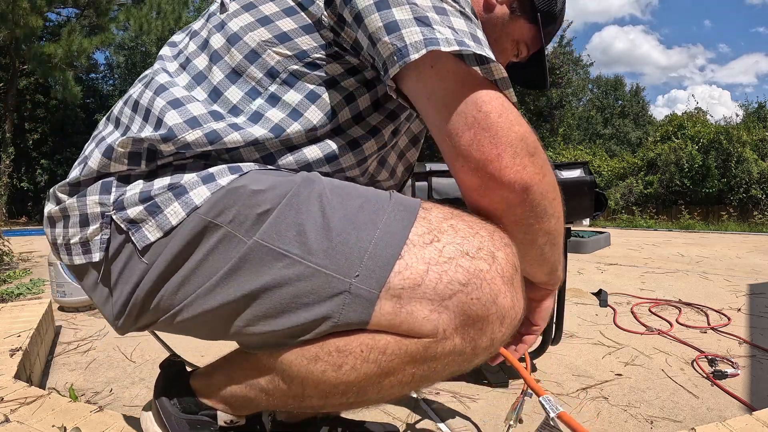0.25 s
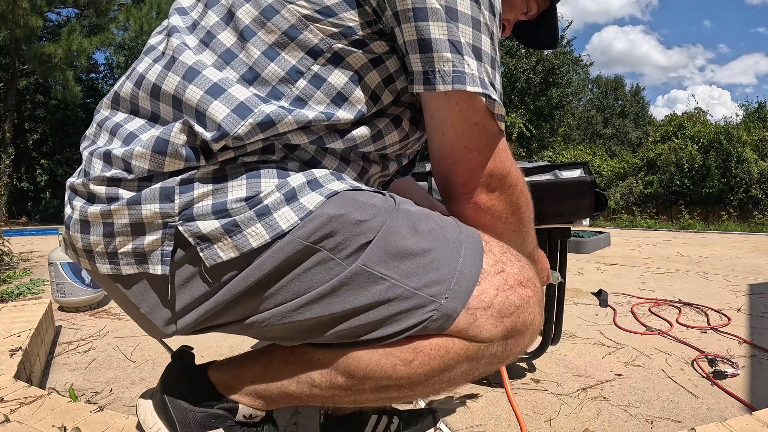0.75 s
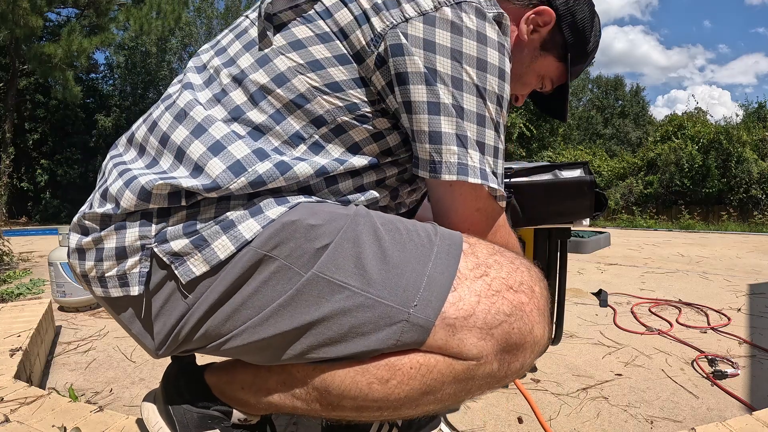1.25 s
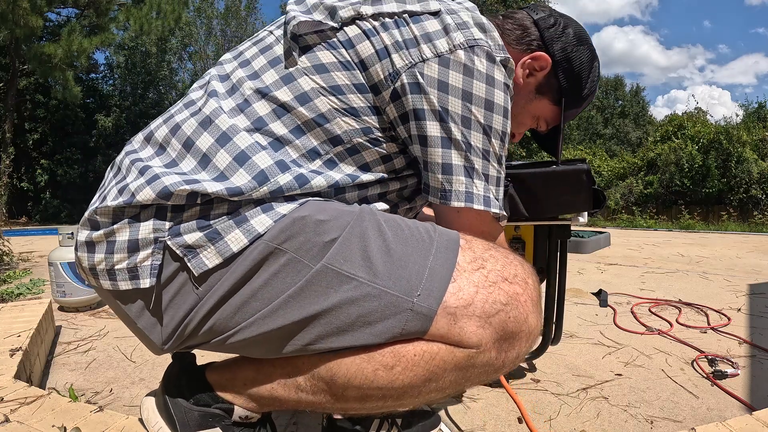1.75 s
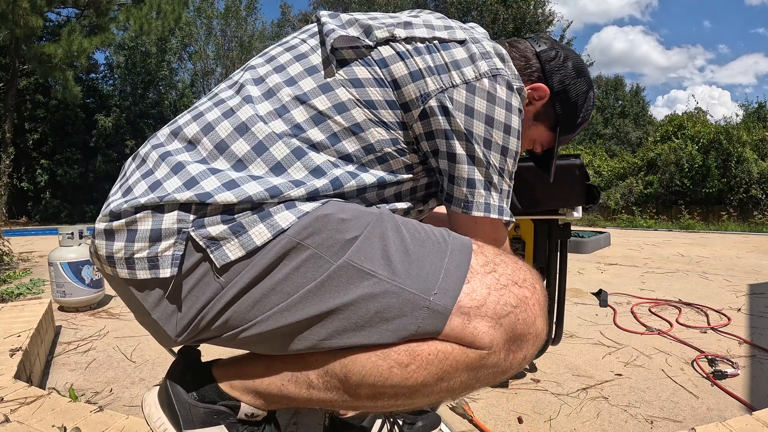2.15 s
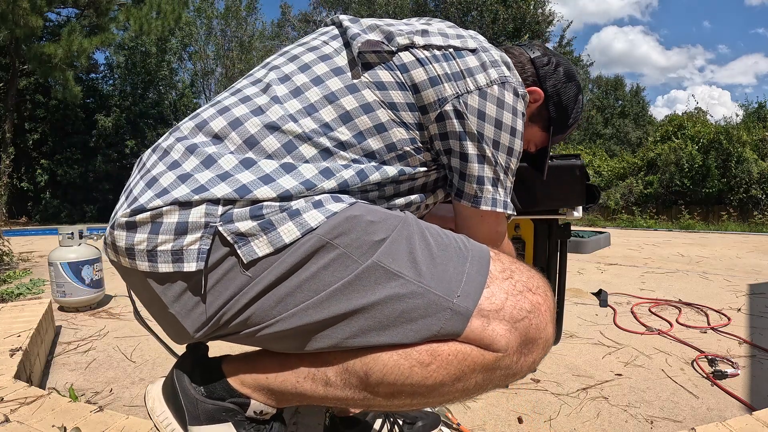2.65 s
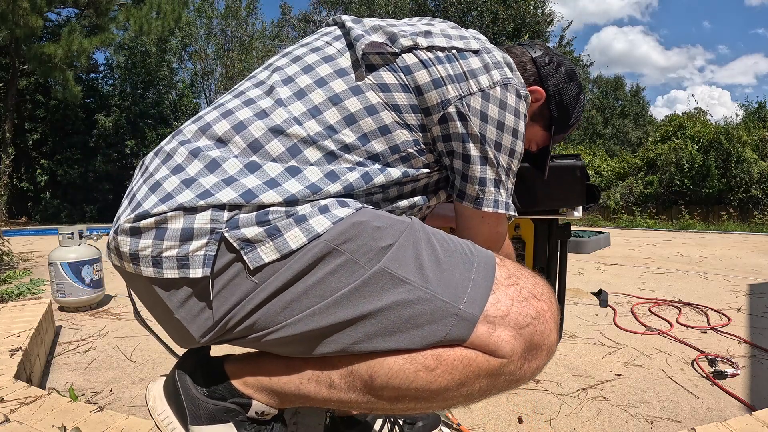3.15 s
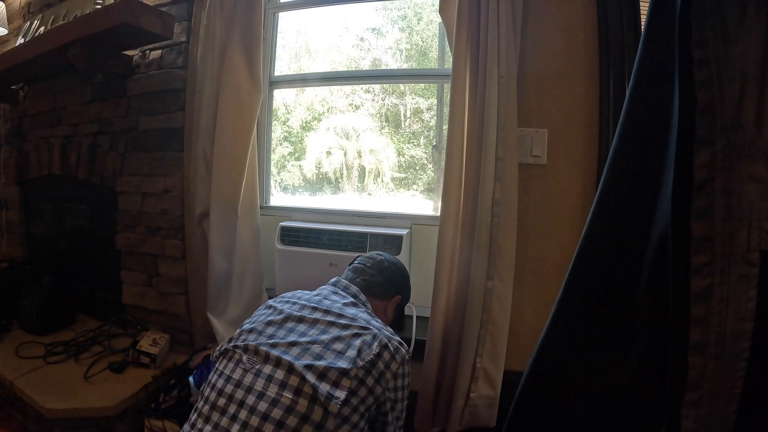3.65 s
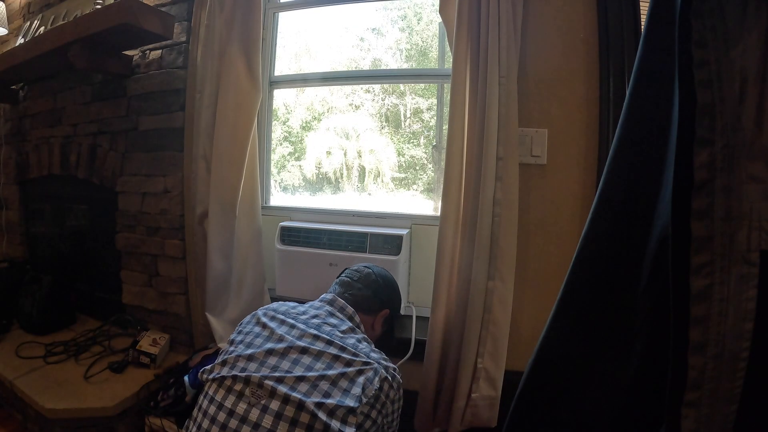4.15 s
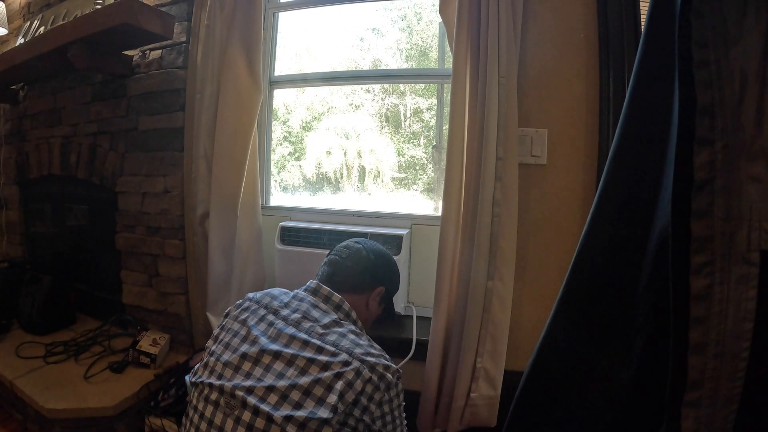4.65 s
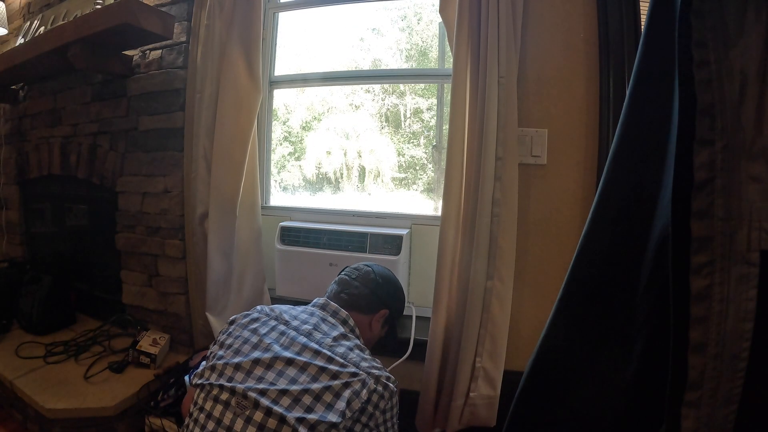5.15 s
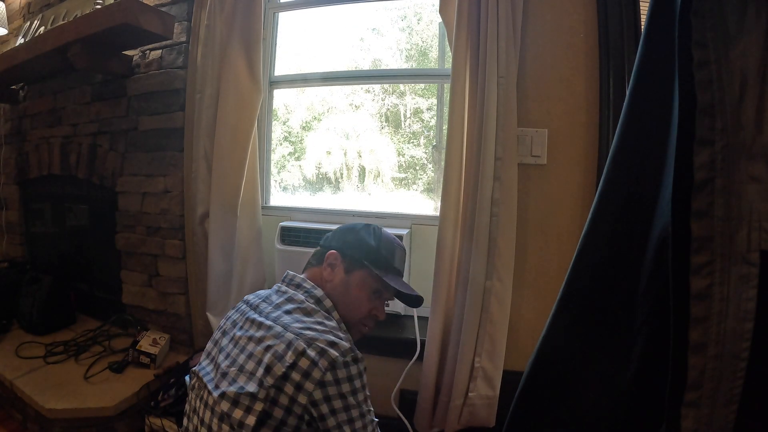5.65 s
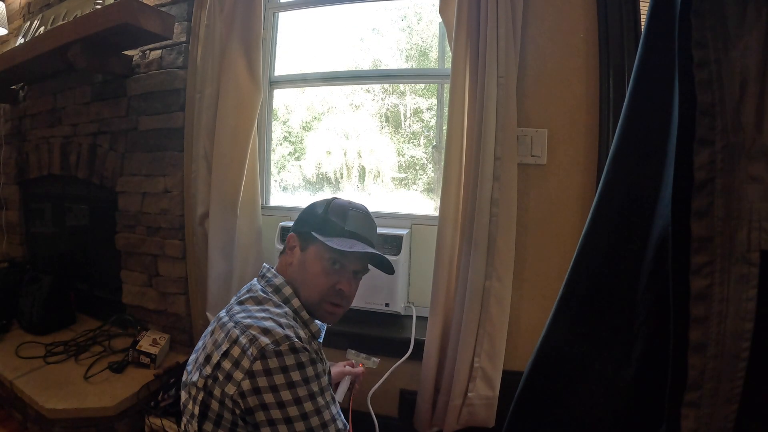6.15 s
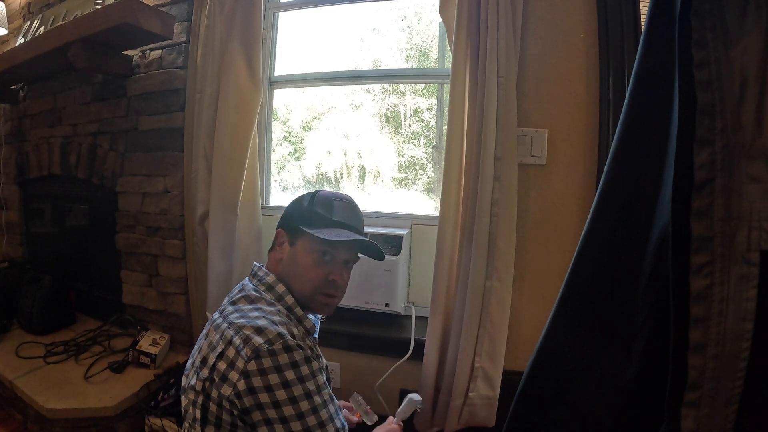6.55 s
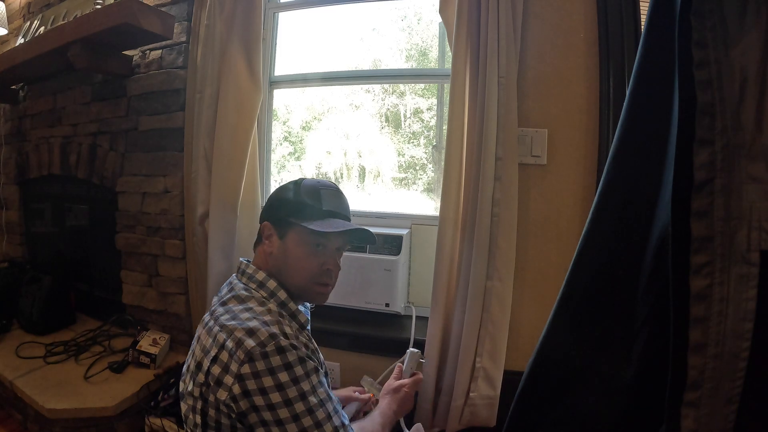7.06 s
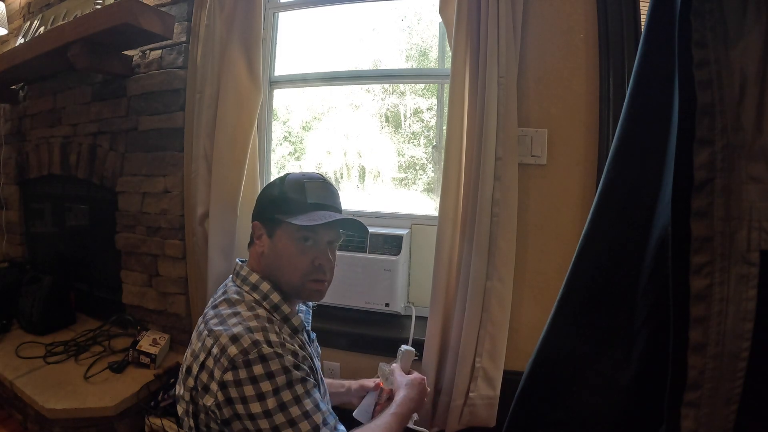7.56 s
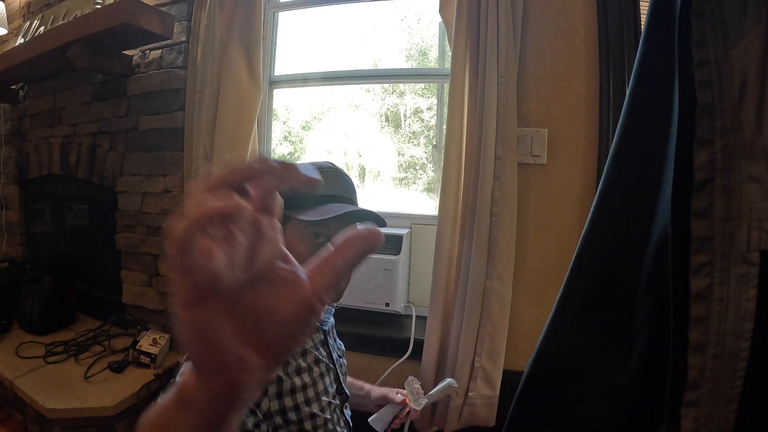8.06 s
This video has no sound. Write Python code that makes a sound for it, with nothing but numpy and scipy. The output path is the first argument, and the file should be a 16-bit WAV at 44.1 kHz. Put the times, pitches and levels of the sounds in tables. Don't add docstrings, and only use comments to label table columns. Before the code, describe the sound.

From 0 to 3.2 seconds a small four-stroke generator runs loud and steady close to a camera microphone outdoors. About thirty firings a second merge into a rough, throbbing low buzz, with rushing air, bright metal clatter, valve tapping and a higher panel tone singing in spells; air noise swells slightly near 0.5 and 2.8. At about 3.25 the sound cuts almost instantly to a room: the engine is now much quieter, a dull bassy drone through the window, narrow at first and opening to wide stereo between 4.6 and 6.9. A light knock comes at 3.5, a tumbling cluster of hollow knocks with cable scraping at 4.0-4.3, softer bumps and rubs at 4.7-5.4. Tiny plastic ticks run from 5.4 to 6.5, a firm double knock lands at 6.56, a clear click at 6.7, fainter contacts at 7.2 and 7.5. Soft sleeve rustles close it after 8.0.

```python
import sys
import numpy as np
from scipy import signal
from scipy.fft import rfft, irfft, next_fast_len
from scipy.io import wavfile
from scipy.ndimage import uniform_filter1d

SR = 44100
rng = np.random.default_rng(int(sys.argv[2]) if len(sys.argv) > 2 else 0)


def voltage_ratio(decibels):
    exponent = np.asarray(decibels, float) / 20
    return 10 ** exponent


def materialize(psi):
    bounded = np.clip(np.atleast_2d(psi).T, -1, 1)
    quanta = np.round(bounded * 32767).astype(np.int16)
    wavfile.write(sys.argv[1], SR, quanta)


N = 365588
T = np.arange(N) / SR
LEAD = int(.2 * SR)

NEAR_FIRING_S, FAR_FIRING_S = .0039, 3.3043
# (time of one firing [s], beat [dB], rush [dB], rumble [dB], size scatter
# [dB], timing scatter [s], throb [dB], clatter [dB], repeating share [0-1], tappet [dB])
NEAR_ENGINE = (NEAR_FIRING_S, -14, -24.5, -34, 0.14, .00008, 0.6, -28.5, 0.24, -45)
FAR_ENGINE = (FAR_FIRING_S, -35.5, -47.5, -45, 0.31, .00008, -0.48, -54.5, 0.53, -120)
# (frequency [Hz], level [dB per Hz])
NEAR_RUMBLE = [(15, -13), (45, 11), (90, 3.5), (180, 13), (300, 9), (420, -39), (900, -91)]
FAR_RUMBLE = [(12, 27), (45, 25), (90, 3), (180, 12), (250, 13.5), (300, -1), (420, -28), (900, -91)]


def generator(near):
    (start, beat_db, rush_db, rumble_db, scatter_db, jitter, throb_db,
     clatter_db, repeat, tappet_db) = NEAR_ENGINE if near else FAR_ENGINE
    cycle, firings, rate = firing_clock(near, start, jitter)
    throb = voltage_ratio(throb_db * np.cos(2 * np.pi * (cycle - .15)) + .5 * walk(9))
    shade = shading(near)
    beat = exhaust_beat(near, firings, rate, scatter_db, beat_db)
    air = air_rush(near, firings, rate, rush_db) * throb * shade
    metal = casing_clatter(near, firings, rate, repeat, clatter_db) * throb
    low = level(colour(rng.standard_normal(N), NEAR_RUMBLE if near else FAR_RUMBLE), rumble_db) * shade
    return beat + air + metal + low + tappets(firings, tappet_db) + frame_panel(near, cycle)


# (time [s], firing rate [firings per s])
NEAR_SPEED = [(.3, 30.585), (.73, 30.542), (1.17, 30.492), (1.6, 30.51), (2.03, 30.591), (2.47, 30.659),
              (2.9, 30.546)]
FAR_SPEED = [(3.64, 30.823), (4.07, 30.786), (4.51, 30.857), (4.94, 30.819), (5.38, 30.744), (5.81, 30.569),
             (6.24, 30.588), (6.68, 30.835), (7.11, 30.726), (7.55, 30.706), (7.98, 30.823)]


def firing_clock(near, start, jitter):
    speed = NEAR_SPEED if near else FAR_SPEED
    rate = speed[0][1]
    cycle = np.cumsum(np.interp(T, *np.transpose(speed))) / SR
    cycle -= np.interp(start, T, cycle)
    turns = np.arange(np.ceil(cycle[0]) - 4, cycle[-1] - 1)
    when = np.interp(turns, np.r_[cycle[0] - 30, cycle], np.r_[-30 / rate, T])
    firings = (when + jitter * rng.standard_normal(len(turns))) * SR + LEAD
    return cycle, firings, rate


# (multiple of the firing rate [1], level [dB])
NEAR_ORDERS = [(1, -6), (2, -0.5), (3, -11.5), (4, 1), (5, 3), (6, -18), (7, 3), (8, -0.5), (9, -12),
               (10, -10), (12, -8), (13, -11.5), (14, -15.5), (15, -17), (17, -14.5), (20, -14),
               (21, -16.5), (22, -21), (23, -7), (24, -27), (25, -34), (26, -35), (27, -16.5), (30, -17),
               (32, -38), (34, -15), (36, -24.5), (38, -26), (40, -15), (44, -24.5)]
FAR_ORDERS = [(1, 2), (2, -9.5), (3, -5.5), (4, 2), (5, 4), (7, -4.5), (8, -18), (9, -12.5), (10, -19.5),
              (11, -6.5), (12, -24), (13, -11), (14, -36), (16, -13.5), (20, -30), (22, -41), (24, -15),
              (25, -56), (26, -21.5), (30, -18), (31, -23), (38, -39), (39, -21), (40, -31), (44, -24.5),
              (45, -23), (46, -30.5)]
# (pitch [Hz], width [Hz])
NEAR_CHAMBERS = [(55, 224), (174, 112), (276, 16)]
FAR_CHAMBERS = [(427, 107), (142, 10)]


def exhaust_beat(near, firings, rate, scatter_db, beat_db):
    orders = dict(NEAR_ORDERS if near else FAR_ORDERS)
    k = np.arange(1, 47)
    db = [orders.get(m, -33.5) for m in k]
    hz = rate * np.r_[0, k, 1.3 * k[-1], 5 * k[-1]]
    pipe = causal(hz, np.r_[-22, db, -70, -130], NEAR_CHAMBERS if near else FAR_CHAMBERS)
    size_db = scatter_db * rng.standard_normal(len(firings))
    return level(-strike(firings, size_db, pipe), beat_db)


# (frequency [Hz], level [dB per Hz])
NEAR_RUSH = [(190, -27), (330, -1.5), (361, -0.5), (468, -4.5), (514, -1), (573, -15), (688, -2), (724, -5),
             (776, -7), (806, -12.5), (1070, -6.5), (1280, -12.5), (1390, -10), (1500, -12.5), (1950, -60),
             (3300, -120)]
FAR_RUSH = [(190, -29), (330, -2), (428, -12), (498, -10.5), (524, -19), (555, -13.5), (642, -13),
            (752, -12.5), (994, -16.5), (1190, -11.5), (1260, -14), (1290, -19.5), (1500, -17.5),
            (1950, -75), (3300, -120)]


def air_rush(near, firings, rate, db):
    repeat = .28
    echoed = repeating_noise(firings, rate, 1.0 * walk(2.488))
    gas = np.sqrt(repeat) * echoed + np.sqrt(1 - repeat) * rng.standard_normal(N)
    return level(colour(gas, NEAR_RUSH if near else FAR_RUSH), db)


# (frequency [Hz], level [dB per Hz])
NEAR_CLATTER = [(1300, -35), (1500, -15.5), (1680, -4.5), (1930, 0), (2270, -8), (2700, -2.5), (3100, -8),
                (4100, -13.5), (5200, -11.5), (5900, -17.5), (7300, -17.5), (8300, -25), (10500, -27),
                (11400, -46), (12100, -34), (13350, -39), (15100, -44.5)]
FAR_CLATTER = [(1300, -7), (1500, -2.5), (2100, -1.5), (2500, -6.5), (2750, -7), (3100, -13), (5000, -20),
               (6800, -23), (8100, -28), (9900, -34.5), (11100, -38), (12300, -33), (13250, -43),
               (13850, -54)]


def casing_clatter(near, firings, rate, repeat, db):
    repeat = np.clip(repeat, .4, 1)
    same = repeating_noise(firings, rate, 1.1 * walk(3))
    metal = np.sqrt(repeat) * same + np.sqrt(1 - repeat) * rng.standard_normal(N)
    return level(colour(metal, NEAR_CLATTER if near else FAR_CLATTER), db)


def tappets(firings, db):
    lash = strike(firings, 2.0 * rng.standard_normal(len(firings)), np.ones(1))
    fade = np.exp(-1 / (0.011 * SR))
    tap = uniform_filter1d(signal.lfilter([1], [1, -fade], np.roll(lash, 300)), 40)
    tone = [(5000, -26), (6800, 4.0), (9500, -6.5), (12000, -9), (13500, -23), (15000, -62)]
    return level(tap * colour(rng.standard_normal(N), tone), db)


# (start [s], hold [s], level [dB])
NEAR_PANEL = [
    (.15, 0.57, -34),
    (0.948, 0.091, -35),
    (1.25, 0.62, -38),
    (2.15, .1, -42),
    (2.9, .3, -56),
]
FAR_PANEL = [
    (3.5, .1, -57),
    (4.05, .4, -59),
    (4.95, .55, -61),
    (5.87, .42, -56),
    (6.55, .08, -59),
    (7.15, 1.1, -58),
]


def frame_panel(near, cycle):
    order = 44 if near else 40
    effort = spells(NEAR_PANEL if near else FAR_PANEL, rise=0.075, fall=0.066)
    tone = np.sin(2 * np.pi * order * cycle + 1.06 * walk(8.7))
    return np.sqrt(2) * effort * voltage_ratio(-0.5 + 0.87 * walk(11)) * tone


# (start [s], hold [s], extra gain [share])
NEAR_SHADE = [
    (.4, 0.42, 0.22),
    (2.7, 0.37, 0.19),
]
FAR_SHADE = [
    (6.65, .1, 0.36),
    (7.45, .1, 0.22),
    (8.2, .1, 0.66),
]


def shading(near):
    rows = NEAR_SHADE if near else FAR_SHADE
    return 1 + sum(share * spells([(s, hold, 0)], 0.14, 0.14) for s, hold, share in rows)


# (time [s], peak [dB], pitch [Hz], upper ring pitch [Hz], upper ring level [dB])
KNOCKS = [(3.462, -34, 352, 880, 3), (4.031, -26, 387, 720, -12), (4.053, -26.5, 392, 1110, -2.5),
          (4.079, -30, 307, 810, -6), (4.122, -31.5, 540, 845, 2), (4.155, -28.5, 357, 802, -1.5),
          (4.19, -21, 338, 930, -5.5), (4.217, -20.5, 384, 724, -8), (4.239, -23, 463, 703, -20),
          (4.28, -29, 391.5, 990, -18), (4.308, -29, 313, 711, -17), (4.718, -29.5, 410, 754, -5),
          (5.123, -35.5, 370, 845, 6.5), (5.273, -29.5, 338, 869, -14), (5.352, -32.5, 302, 940, 1.5),
          (6.559, -20.5, 264, 886, 0), (6.564, -21.5, 251, 704, -3), (6.575, -29, 295, 1150, -18),
          (6.59, -34, 352, 1000, -12), (7.493, -33, 257, 790, 1)]


def knocks():
    out = np.zeros(N)
    for s, db, hz, upper_hz, ring_db in KNOCKS:
        body = 0.99 * ring(hz, 0.061, 0.0018) + 0.59 * burst(hz * 0.854, 384, 0.1)
        upper = 0.78 * ring(upper_hz, 0.041, 0.0007) + 0.43 * burst(900, 1500, 0.03)
        upper += 0.21 * burst(900, 1800, 0.57)
        crack = 0.73 * ring(3170, 0.031, .001) + .15 * burst(3200, 1200, 0.03)
        crack_db = -19 + 1.7 * ring_db
        add(out, s, voltage_ratio(db) * (body + voltage_ratio(ring_db) * upper + voltage_ratio(crack_db) * crack))
    return out


# (time [s], peak at 6-10 kHz [dB], level below that band [dB], level above it [dB])
TICKS = [(5.3698, -64, -3, -7), (5.4774, -64, 2, -5), (5.5523, -59, -4, -12), (5.5844, -59, -2, -16),
         (5.6294, -62, -1, -17), (5.9379, -57, -5, -22), (5.9813, -61, -4.5, -11), (6.0067, -52, -3, -16),
         (6.2302, -59, 3, -14), (6.2507, -54, -10, -17), (6.3165, -55, -3, -22), (6.3394, -60, 7, -23),
         (6.3844, -63, 0, -10), (6.4448, -51, -7, -33), (6.5576, -58.5, 9, -27), (6.7032, -44.5, 1, -19),
         (7.1826, -53, -11, -29)]


def ticks():
    out, t60 = np.zeros(N), 0.03
    for s, db, low_db, top_db in TICKS:
        click = burst(7500, 3600, t60)
        click += voltage_ratio(low_db + 2.5) * burst(4300, 2200, t60)
        click += voltage_ratio(top_db) * burst(11800, 3000, t60)
        add(out, s, voltage_ratio(db) * click)
    return out


# (start [s], hold [s], level [dB])
DRAG = [
    (4.04, 0.14, -38),
    (4.2, 0.078, -35.5),
    (4.99, 0.071, -40.5),
    (5.12, 0.068, -41),
    (5.3, 0.046, -42),
    (6.565, .03, -37.5),
]
# (start [s], hold [s], level [dB])
SLEEVE = [
    (4.2, .05, -73.5),
    (8.06, .09, -68.5),
    (8.23, .12, -67.5),
]


def handling():
    floor = [(150, -8.0), (280, 7), (400, 5.5), (560, -1.5), (1200, -12), (4000, -56), (9000, -68)]
    weave = [(1500, -8), (4000, 1.5), (8000, -3), (13000, -18), (15500, -36)]
    drag = level(colour(rng.standard_normal(N), floor), 0)
    cloth = level(colour(rng.standard_normal(N), weave), 0)
    drag *= spells(DRAG, rise=.015, fall=0.15) * voltage_ratio(-4.5 + 1.4 * walk(60))
    cloth *= spells(SLEEVE, rise=0.05, fall=.025) * voltage_ratio(4.5 + 0.9 * walk(60))
    return drag + cloth


# (frequency [Hz], level [dB])
NEAR_SIDE = [(60, -33), (110, -45), (200, -23.5), (370, -29.5), (690, -4), (1260, -8), (2320, -6),
             (4270, -7), (7850, -9.5), (14400, 2)]
FAR_SIDE = [(60, -64), (110, -68), (200, -55), (370, -50), (690, -14), (1260, -11), (2320, -7),
            (4270, -6.5), (7850, -8), (14400, -1)]
# (frequency [Hz], level [dB])
NEAR_LEAN = [(60, 0.0), (110, 0.0), (200, -0.8), (370, 0.5), (690, -0.5), (1260, -3.5), (2320, -1.2),
             (4270, -0.5), (7850, -0.5), (14400, 6)]
FAR_LEAN = [(60, 0.0), (110, 0.0), (200, 0.0), (370, -0.5), (690, -0.5), (1260, 0.5), (2320, 0), (4270, 1),
            (7850, 1.0), (14400, 8)]
# (time [s], level [dB])
WIDEN = [
    (4.6, -60),
    (5.1, -21),
    (6.9, 0),
]


def camera_ports(mid, near):
    side, lean = (NEAR_SIDE, NEAR_LEAN) if near else (FAR_SIDE, FAR_LEAN)
    spread_s, loose_db = (0.018, -2.2) if near else (.02, -0.61)
    hz, db = np.transpose(lean)
    uneven = (colour(mid, np.c_[hz, db / 2]) - colour(mid, np.c_[hz, -db / 2])) / 2
    t = np.arange(8192) / SR
    echoes = rng.standard_normal(len(t)) * np.exp(-t / spread_s)
    smear = irfft(np.exp(1j * np.angle(rfft(echoes))))
    width = uneven + voltage_ratio(loose_db) * colour(signal.fftconvolve(mid, smear)[:N], side)
    if not near:
        width = width * voltage_ratio(np.interp(T, *np.transpose(WIDEN)))
    return mid + np.array([[1], [-1]]) * width


def strike(firings, size_db, response):
    whole = firings.astype(int)
    pulses = np.zeros(N + LEAD)
    pulses[whole] = voltage_ratio(size_db) * (1 - firings + whole)
    pulses[whole + 1] = voltage_ratio(size_db) * (firings - whole)
    return signal.fftconvolve(pulses, response)[LEAD:N + LEAD]


def repeating_noise(firings, rate, drift):
    first, second = rng.standard_normal((2, int(SR / rate)))
    return level(np.cos(drift) * strike(firings, 0, first) + np.sin(drift) * strike(firings, 0, second), 0)


def causal(hz, db, chambers, size=8192):
    f = np.arange(size // 2 + 1) * SR / size
    cep = irfft(np.log(voltage_ratio(np.interp(f, hz, db))))
    cep[1:size // 2] *= 2
    cep[size // 2 + 1:] = 0
    lag = sum(2 * np.arctan2(width * f, centre ** 2 - f ** 2) for centre, width in chambers)
    return irfft(np.exp(rfft(cep) - 1j * lag))


def ring(hz, t60, rise):
    t = np.arange(6000) / SR
    return np.sin(2 * np.pi * hz * t) * voltage_ratio(-60 * t / t60) * (1 - np.exp(-t / rise))


def burst(hz, width, t60, size=6000):
    t = np.arange(size) / SR
    edges = [max(hz - width / 2, 50), min(hz + width / 2, 16000)]
    band = signal.butter(3, edges, "bandpass", fs=SR, output="sos")
    noise = rng.standard_normal(size) * voltage_ratio(-60 * t / t60) * (1 - np.exp(-t / 0.0006))
    x = signal.sosfilt(band, noise)
    return x / np.abs(x).max()


def add(out, s, x):
    i = int(s * SR)
    out[i:i + len(x)] += x[:N - i]


def spells(rows, rise, fall):
    out = np.zeros(N)
    for s, hold, db in rows:
        out += voltage_ratio(db) * np.exp(np.minimum(T - s, 0) / rise - np.maximum(T - s - hold, 0) / fall)
    return out


def walk(rate):
    k = int(SR / rate)
    steps = np.repeat(rng.standard_normal(N // k + 1), k)
    return level(uniform_filter1d(uniform_filter1d(steps, k), k)[:N], 0)


def level(x, db):
    return x * voltage_ratio(db) / np.sqrt(np.mean(x ** 2))


def colour(x, table):
    hz, db = np.transpose(table)
    size = next_fast_len(len(x))
    f = np.arange(size // 2 + 1) * SR / size + 1
    gain = voltage_ratio(np.interp(np.log(f), np.log(hz), db))
    return irfft(rfft(x, size) * gain, size)[:len(x)]


def scene():
    patio = camera_ports(generator(near=True), near=True)
    room = camera_ports(generator(near=False) + knocks() + ticks() + handling(), near=False)
    out_start_s, out_s, in_start_s, in_s = 3.23, 0.017, 3.272, 0.022
    fade_out = voltage_ratio(-2.5 - 100 * (1 - np.exp(-np.maximum(T - out_start_s, 0) / out_s)))
    fade_in = voltage_ratio(-80 * np.exp(-np.maximum(T - in_start_s, 0) / in_s)) * (T > in_start_s)
    return patio * fade_out + room * fade_in


def low_pass(x):
    return signal.sosfilt(signal.butter(12, 15040, fs=SR, output="sos"), x)


def record(dry):
    top = [(20, 1), (13000, 0.47), (13700, 0.0), (14400, -1), (15100, -2)]
    rounded = np.tanh(0.94 * dry) / 0.88
    mix = np.array([colour(channel, top) for channel in rounded])
    return low_pass(mix)


dry = scene()
out = record(dry)
materialize(out)
```